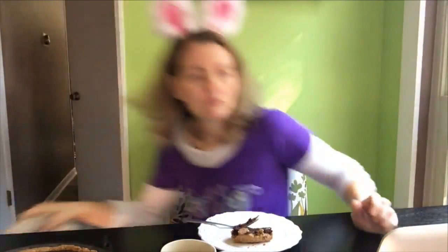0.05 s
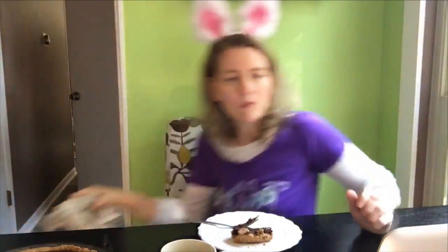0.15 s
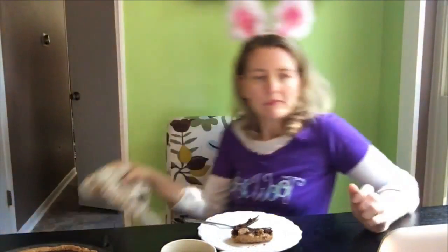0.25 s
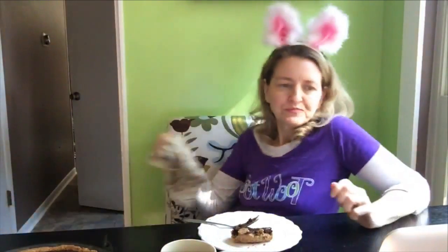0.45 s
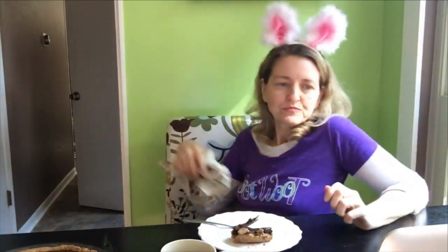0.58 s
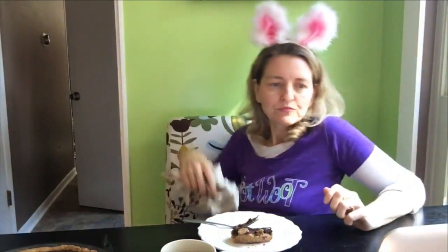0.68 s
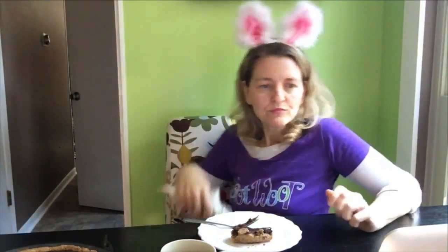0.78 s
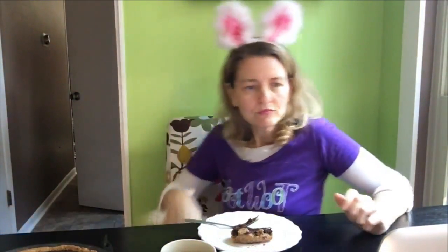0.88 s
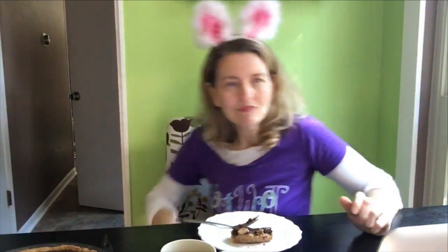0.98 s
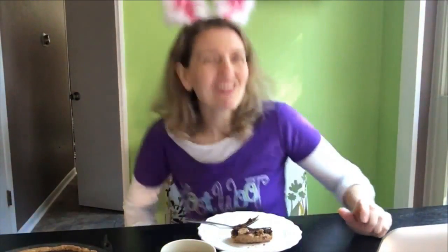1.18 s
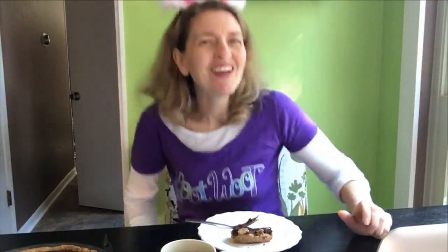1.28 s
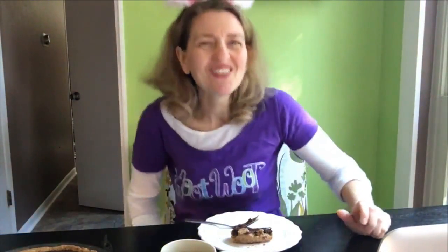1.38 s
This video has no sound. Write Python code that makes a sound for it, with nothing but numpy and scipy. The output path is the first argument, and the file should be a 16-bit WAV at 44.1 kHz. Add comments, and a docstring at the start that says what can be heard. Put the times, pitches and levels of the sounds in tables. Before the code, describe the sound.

Someone drops onto a wooden chair, its legs scraping briefly as clothing swishes.

```python
"""Someone drops onto a wooden chair in a quiet kitchen. First the clothes swish by friction, and the
padded seat takes the weight with a low thump. The legs then judder on the floor, each slip exciting
the modes of the frame, and the joints clack tight. Last, cloth slides on as the sitter settles and
leans forward, with two faint groans of the frame and a few soft thuds on seat and table.
The small room rings briefly after each contact."""
import sys
import numpy as np
from scipy import signal
from scipy.fft import rfft, irfft, next_fast_len
from scipy.io import wavfile
from scipy.ndimage import map_coordinates

SR = 44100
rng = np.random.default_rng(int(sys.argv[2]) if len(sys.argv) > 2 else 0)


def bounce(signal):
    """Save signal as a 16-bit WAV file at the path given by the first command-line argument."""
    frames = np.transpose(np.atleast_2d(signal))
    limited = np.clip(frames, -1, 1)
    pcm = np.round(limited * 32767).astype(np.int16)
    wavfile.write(sys.argv[1], SR, pcm)


N = 63945


def amp(db):
    """Amplitude ratio of a level in decibels."""
    return 10 ** (np.asarray(db) / 20)


def unit(x):
    """Normalisation to an rms of 1."""
    return x / np.sqrt(np.mean(x ** 2) + 1e-20)


def along(points, hz):
    """Interpolation of (frequency [Hz], value) points on a logarithmic frequency axis."""
    knots_hz, values = np.transpose(points)
    return np.interp(np.log(hz + 1), np.log(knots_hz + 1), values)


def since(onset):
    """Seconds elapsed since the onset, zero before it."""
    return np.maximum(np.arange(N) / SR - onset, 0)


def filtered(x, response):
    """Linear filtering: the spectrum of x is multiplied by a frequency response."""
    size = next_fast_len(N + SR // 2)
    hz = np.fft.rfftfreq(size, 1 / SR)
    return irfft(rfft(x, size) * response(hz), size)[..., :N]


def coloured(x, spectrum):
    """Spectral shaping of x by (frequency [Hz], level [dB]) points, at an rms of 1."""
    return unit(filtered(x, lambda hz: amp(along(spectrum, hz))))


def wobble(knots_per_s):
    """Smooth random modulation: a spline through Gaussian values."""
    knots = rng.standard_normal(int(N * knots_per_s / SR) + 4)
    return map_coordinates(knots, [np.arange(N) * knots_per_s / SR])


def strike(onset, rise_s, t60):
    """Envelope of a damped impact: a fast rise and an exponential decay of 60 dB in t60 seconds."""
    t = since(onset)
    return (1 - np.exp(-t / rise_s)) * np.exp(-np.log(1000) * t / t60)


def burst(onset, spectrum, t60):
    """A brief contact excites a broad band, heard as decaying coloured noise."""
    return strike(onset, rise_s=0.00023, t60=t60) * coloured(rng.standard_normal(N), spectrum)


def room_tone():
    """Stationary background noise, strongest in the bass."""
    # background spectrum (frequency [Hz], relative level [dB])
    spectrum = [(20, 3.5), (38, -5), (75, -3.5), (130, -10), (300, -16), (1000, -16.5), (4000, -22),
                (15000, -36)]
    return amp(-57) * coloured(rng.standard_normal(N), spectrum)


def reverberation(x):
    """Diffuse reflections build up in the kitchen; absorption damps each frequency at its own rate."""
    # reverberation times (frequency [Hz], t60 [s])
    decay_times = [(80, 0.51), (500, 0.35), (3000, 0.51), (8000, 0.18), (15000, 0.23)]
    build_up_s = 0.004
    hz, t, noise = signal.stft(rng.standard_normal(SR // 2), SR, nperseg=256)
    decay = np.exp(-np.log(1000) * t / along(decay_times, hz)[:, None])
    tail = signal.istft(noise * decay, SR, nperseg=256)[1]
    tail *= 1 - np.exp(-np.arange(len(tail)) / SR / build_up_s)
    return signal.fftconvolve(x, tail / np.linalg.norm(tail))[:N]


def friction(spectrum, flutter_db):
    """Friction noise: random impulses of slipping fibres add in power to smooth rubbing noise."""
    slips_per_s, slip_share = 2500, 0.26
    slips = (rng.random(N) < slips_per_s / SR) * rng.standard_normal(N)
    rub = np.sqrt(slip_share) * unit(slips) + np.sqrt(1 - slip_share) * rng.standard_normal(N)
    return coloured(rub, spectrum) * amp(flutter_db * wobble(knots_per_s=59.74))


def clothes():
    """Sliding friction of cloth on cloth and upholstery radiates a dull swish, a hiss and a fine fizz."""
    # course of the sliding (time [s], swish level [dB], hiss level [dB], fizz level [dB])
    sliding = [(0, -69, -71, -80), (.06, -61, -58.5, -68), (0.196, -53.5, -52.5, -90),
               (0.241, -36.5, -43, -55), (.265, -37.5, -42.5, -50), (0.351, -42.5, -47, -56.5),
               (.385, -37, -44, -52), (.42, -38.5, -43.5, -47), (.47, -43.5, -48.5, -58.5),
               (.56, -48.5, -53, -57), (.69, -50, -51, -56), (.76, -55, -58, -63.5), (.87, -56, -60.5, -65),
               (.98, -52.5, -55, -62.5), (1.09, -48, -54, -60.5), (1.17, -47.5, -53, -54),
               (1.23, -49, -54.5, -64), (1.37, -48, -69.5, -68), (1.45, -50, -58.5, -61.5)]
    # spectra of the three bands (frequency [Hz], relative level [dB])
    swish = [(60, -19), (200, -7.5), (430, -1.5), (800, -2), (1250, -3), (1900, -13.5), (3500, -19.5),
             (9000, -35)]
    hiss = [(600, -11.5), (1900, 4), (3400, -2), (4300, -3.5), (5400, -9), (8000, -11), (10500, -27.5),
            (15700, -29)]
    fizz = [(2500, -21), (5500, 0.5), (8400, -2.5), (10300, -9), (14000, -11.5), (15700, -24)]
    times, swish_db, hiss_db, fizz_db = np.transpose(sliding)
    envelope = lambda db: amp(np.interp(since(0), times, db))
    return (envelope(swish_db) * friction(swish, flutter_db=0.57)
            + envelope(hiss_db) * friction(hiss, flutter_db=1.2)
            + envelope(fizz_db) * friction(fizz, flutter_db=1.1))


def ticks():
    """Light impacts of cloth and hands on the furniture give short broadband transients."""
    # contacts (time [s], level [dB])
    contacts = [(0.215, -45), (.231, -36.5), (0.244, -35), (0.5196, -36)]
    # spectrum of a tick (frequency [Hz], relative level [dB])
    spectrum = [(300, -7), (800, -5), (1500, 3), (3300, -0.5), (5300, -8.5), (8000, -15), (15000, -35)]
    return sum(amp(db) * burst(onset, spectrum, t60=0.048) for onset, db in contacts)


def groans():
    """As the weight shifts, the loaded frame vibrates at one frequency under a Gaussian envelope."""
    # tone pulses (time [s], level [dB], frequency [Hz], half-width at 1/e [s])
    pulses = [(0.674, -41, 433.8, 0.0067), (0.73, -49.5, 436, 0.013)]
    t = since(0)
    return sum(amp(db) * np.exp(-((t - centre) / width) ** 2) * np.sin(2 * np.pi * hz * t)
               for centre, db, hz, width in pulses)


def joints():
    """The joints snap tight under the load: hard impacts, whose spectrum reaches into the treble."""
    # cluster of clacks (time [s], level [dB], t60 [s])
    clacks = [(.3939, -24.5, 0.048), (0.3985, -23, 0.014), (0.407, -30.5, 0.059)]
    # spectrum of a clack (frequency [Hz], relative level [dB])
    spectrum = [(200, -14.5), (600, -10), (850, -3), (1100, 4), (1500, -6), (2000, 2.5), (2450, -12),
                (2850, -3), (3550, -4), (4200, -22), (4900, -19), (5300, -10), (5800, -20.5), (8700, -18.5),
                (10500, -29.5), (15000, -34)]
    return sum(amp(db) * burst(onset, spectrum, t60) for onset, db, t60 in clacks)


def thuds():
    """Cushioned impacts excite a few low cycles that sag in pitch; the squeezed padding puffs."""
    # blows of the body on seat and table (time [s], level [dB], final frequency [Hz], rise time [s])
    blows = [(.192, -49, 96.5, 0.014), (.226, -35.5, 129, 0.0072), (0.2684, -22.5, 84.6, 0.011),
             (0.294, -36.5, 58, 0.042), (.335, -34, 106.6, 0.013), (0.373, -35, 102, 0.015),
             (.503, -38, 113, 0.0095), (.517, -34.5, 147.6, 0.017), (0.563, -49.5, 155, 0.032),
             (1.165, -39.5, 88.5, .013), (1.327, -44.5, 149, 0.0082)]
    # spectrum of the puff (frequency [Hz], relative level [dB])
    puff_spectrum = [(50, -19), (130, -5), (240, 1), (450, -13), (1200, -28), (4000, -70)]
    sag_share, sag_s = 0.22, 0.005  # the pitch starts high by this share, then relaxes
    out = np.zeros(N)
    for onset, db, hz, rise_s in blows:
        t = since(onset)
        cycles = hz * (t + sag_share * sag_s * (1 - np.exp(-t / sag_s)))
        swell = (t / rise_s * np.exp(1 - t / rise_s)) ** 4  # the exponent softens the onset
        puff = amp(-13) * burst(onset, puff_spectrum, t60=0.15)
        out += amp(db) * (swell * np.sin(2 * np.pi * cycles) + puff)
    return out


def legs():
    """Stick-slip motion: each slip of the legs scuffs the floor and excites the frame's damped modes."""
    # slips on the floor (time [s], level [dB])
    slips = [(.2865, -24), (.2962, -15), (.3125, -27.5), (.3265, -25), (.352, -33), (.375, -32.5)]
    # modes of the wooden chair (frequency [Hz], relative level [dB], t60 [s])
    modes = [(248, -26, .2), (316.3, -12.5, 0.24), (368, -25.5, 0.51), (428.4, -10.5, 0.15),
             (568, -7, 0.12), (599.5, -2.5, 0.064), (644, -8, 0.23), (726, -13.5, 0.068), (938, -21, 0.17),
             (1170.5, -16.5, .12), (1554, -28.5, 0.19), (1808, -25.5, 0.42), (2140, -26, 0.056)]
    # spectrum of a scuff (frequency [Hz], relative level [dB])
    scuff_spectrum = [(120, -23), (300, -4.5), (620, 0.5), (850, -28), (1300, -4), (2100, -4), (4000, -30),
                      (12000, -36)]
    out = np.zeros(N)
    for onset, db in slips:
        ring = np.zeros(N)
        for hz, mode_db, t60 in modes:
            envelope = amp(mode_db + rng.normal(0, 1)) * strike(onset, rise_s=0.00085, t60=t60)
            ring += envelope * np.sin(2 * np.pi * hz * since(onset))
        scuff = burst(onset, scuff_spectrum, t60=0.034)
        out += amp(db) * (amp(0.5) * ring + amp(-10) * scuff)
    return out


def scene():
    """Superposition of direct sound, reverberation and room tone, the same in both channels."""
    frame = legs() + groans()
    clicks = joints() + ticks()
    thumps = thuds()
    room = reverberation(amp(-8) * frame + amp(-6.5) * clicks + amp(-18.5) * thumps)
    mono = frame + clicks + thumps + room + clothes() + room_tone()
    return np.array([mono, mono])


def record(dry):
    """Band limiting: an ideal low-pass filter removes everything above its cutoff."""
    cutoff_hz = 15750
    return filtered(dry, lambda hz: hz < cutoff_hz)


dry = scene()
out = record(dry)
bounce(out)
```